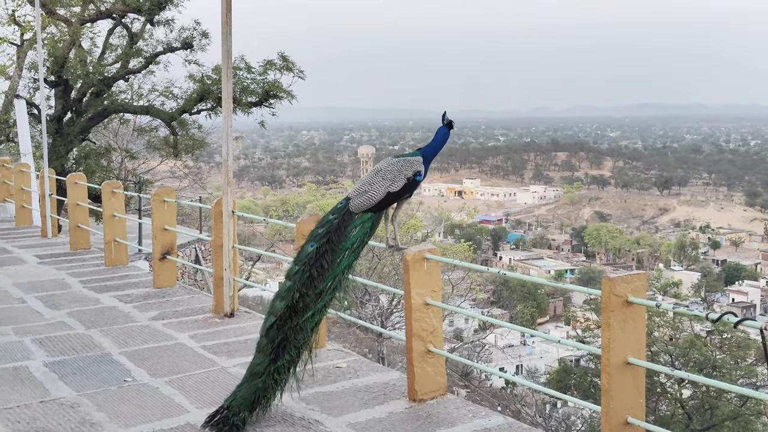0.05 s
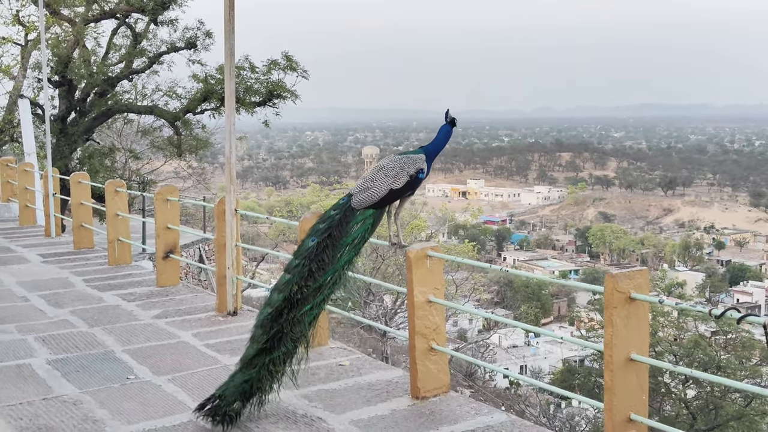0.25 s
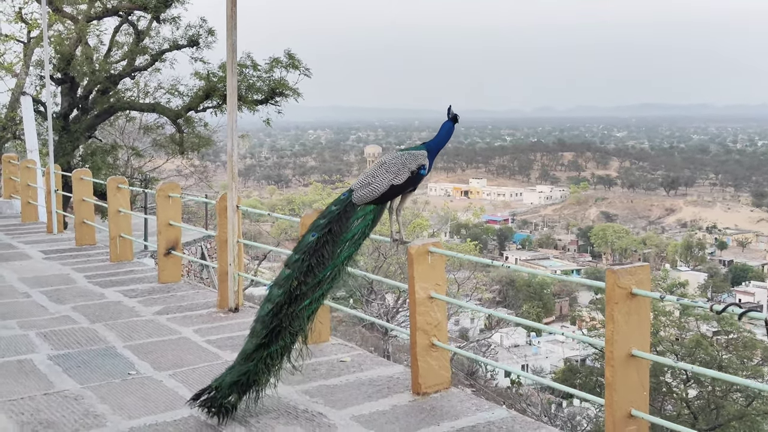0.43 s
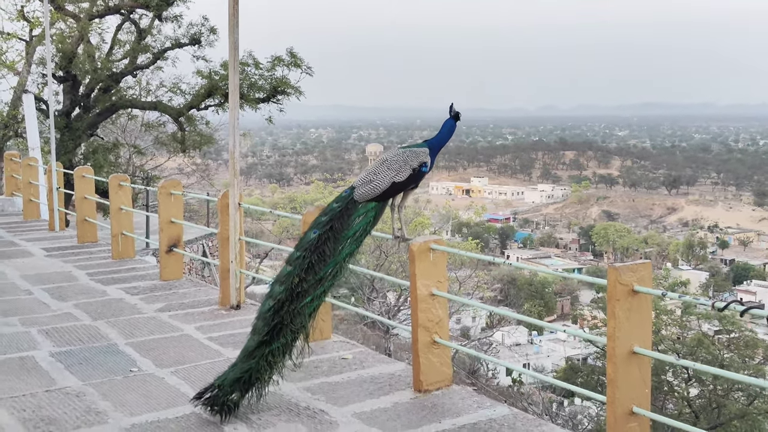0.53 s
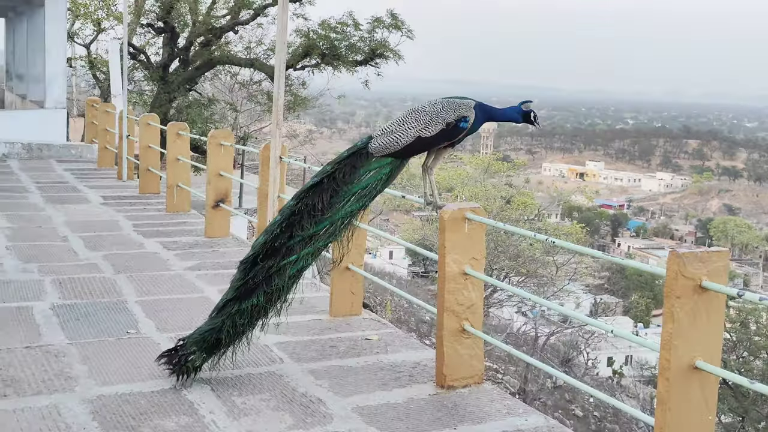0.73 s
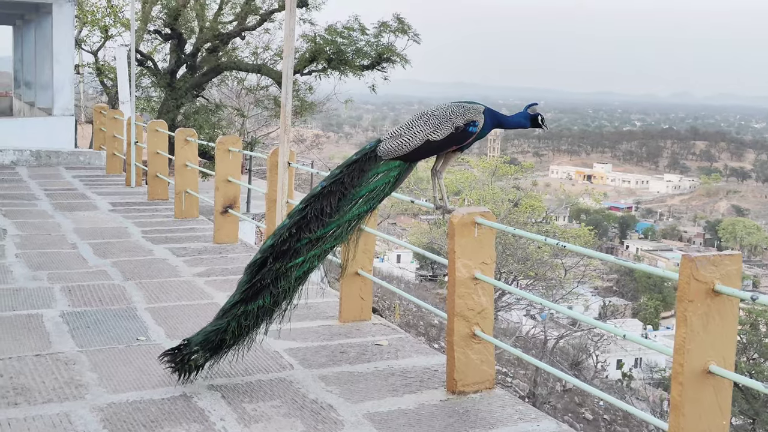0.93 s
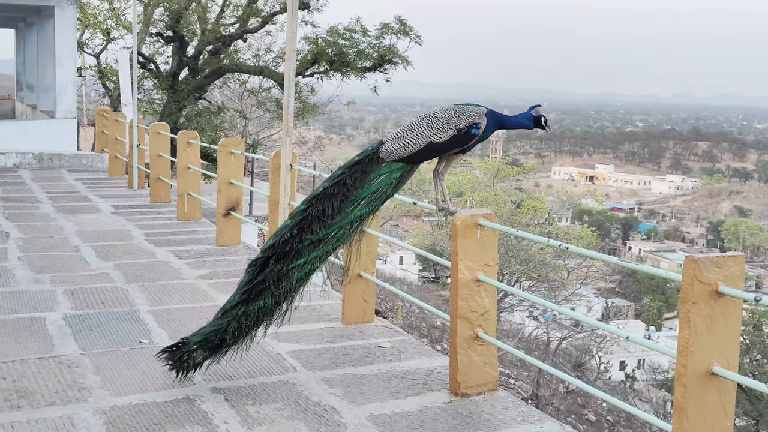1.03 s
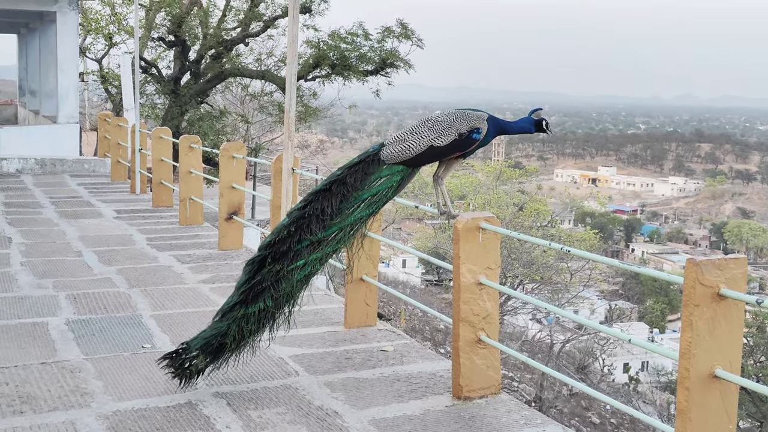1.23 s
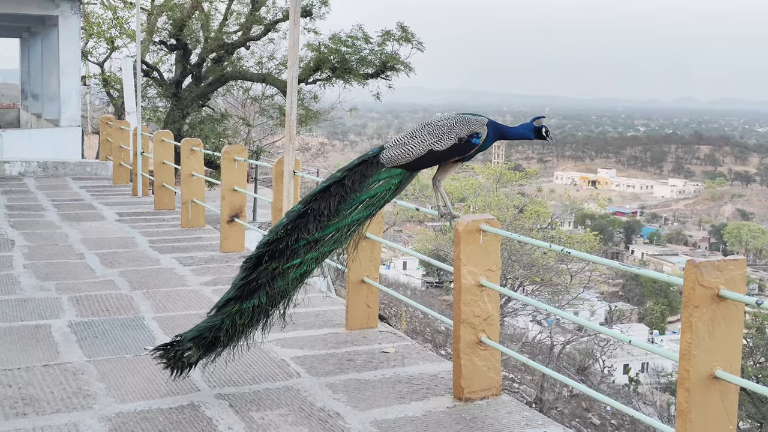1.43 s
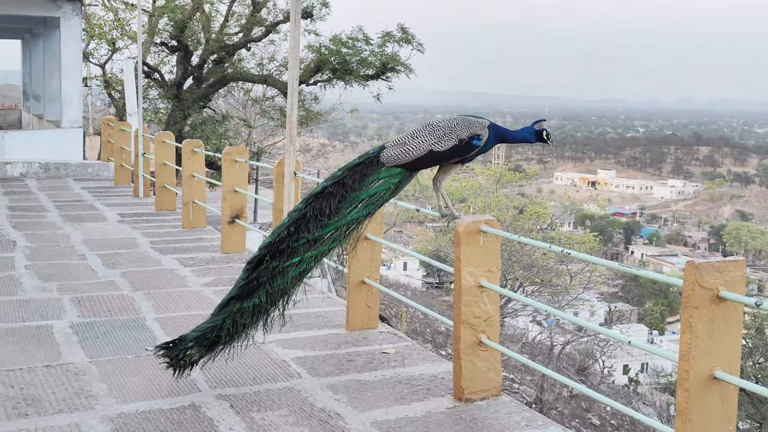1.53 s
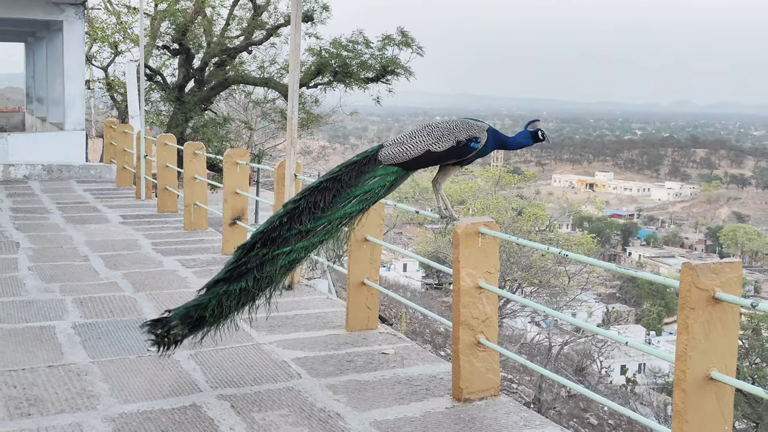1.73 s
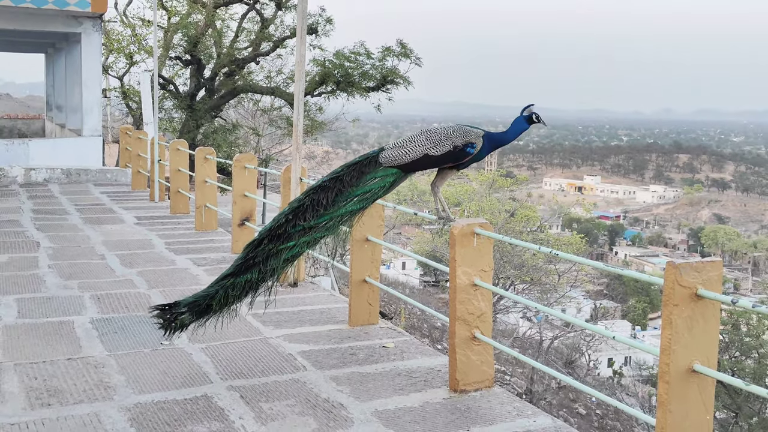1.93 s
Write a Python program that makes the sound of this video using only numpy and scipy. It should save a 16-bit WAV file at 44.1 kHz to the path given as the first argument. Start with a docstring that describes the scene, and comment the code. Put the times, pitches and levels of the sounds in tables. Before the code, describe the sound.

A peacock calls twice, close and loud: a croaky, fluttering honk that sags in pitch, then a clearer call stepping up and falling. Faint echoes trail over the open hillside, with a faint far cry at the end.

```python
"""A peacock gives two loud honking calls close by: the first croaks, then flutters as it sags; the second
steps up to a clear, higher arch. Each call is a jittering harmonic stack shaped by a moving throat, plus rasp.
Terrace and hillside answer faintly: single reflections and scattered tails, convolved with the bird.
Filtered noise makes the outdoor hiss, which drops away in the first call to leave a hush and a thin fizz.
Near the end one wavering partial makes a faint, rising cry far away."""
import sys
import numpy as np
from scipy import signal
from scipy.fft import rfft, irfft
from scipy.io import wavfile
from scipy.ndimage import uniform_filter1d, map_coordinates

SR = 44100
rng = np.random.default_rng(int(sys.argv[2]) if len(sys.argv) > 2 else 0)


def generate_wav(signal):
    """Clip the signal to [-1, 1] and save it as 16-bit WAV at the path in sys.argv[1]."""
    frames = np.transpose(np.atleast_2d(signal))
    scaled = np.clip(frames, -1, 1) * 32767
    pcm = np.round(scaled).astype(np.int16)
    wavfile.write(sys.argv[1], SR, pcm)


N = 88200  # 2 s

JITTER_HZ = 517  # rate of the pitch jitter, near and far


def amp(db):
    """Decibels to gain."""
    return 10 ** (np.asarray(db) / 20)


def unit(x):
    """Scales to rms 1."""
    return x / np.sqrt(np.mean(x ** 2) + 1e-20)


def at_hz(points, hz):
    """Reads a spectrum on a log-frequency axis."""
    f, value = np.transpose(points)
    return np.interp(np.log(hz + 1), np.log(f + 1), value)


def at_time(rows, t):
    """Reads every column of a curve table, whose first column is time."""
    s, *columns = np.transpose(rows)
    return [np.interp(t, s, c) for c in columns]


def add(mix, s, sound):
    """Mixes a sound in, starting at s seconds."""
    part = mix[round(s * SR):][:len(sound)]
    part += sound[:len(part)]


def colour(x, points):
    """Filters by a spectrum, with zero phase."""
    hz = np.fft.rfftfreq(2 * N, 1 / SR)
    filtered = irfft(rfft(x, 2 * N) * amp(at_hz(points, hz)))
    return filtered[..., :x.shape[-1]]


def wander(t, hz):
    """Smooth chance of rms about 1, with a new value at the given rate."""
    return map_coordinates(rng.standard_normal(2000), [(t - t[0]) * hz], order=2, mode="wrap")


def patchy_noise(points, size=512):
    """Noise of a given spectrum at rms 1, its level varying in small random patches of time and pitch."""
    patch_db = 2
    _, _, z = signal.stft(rng.standard_normal(N), SR, nperseg=size)
    patches = uniform_filter1d(rng.standard_normal(z.shape), size=6, axis=0)  # across frequency
    patches = unit(uniform_filter1d(patches, size=10, axis=1))  # across time
    _, noise = signal.istft(z * amp(patch_db * patches), SR, nperseg=size)
    return unit(colour(noise[:N], points))


def outdoors():
    """Three beds of shaped noise: a hiss that drops as the first call swells, a faint hush and a fizz."""
    # noise spectra: [f/Hz, relative level/dB]
    hiss_colour = [(25, -24), (60, -9.5), (170, -13.5), (320, -8), (460, -11), (700, -8.5), (1160, -5.5),
                   (1520, -7), (2100, -2), (2600, -10.5), (3000, -8), (4500, -11.5), (6100, -10.5),
                   (8250, -8), (10100, -10.5), (11000, -29), (15300, -31)]
    hush_colour = [(25, -3), (70, 0), (150, -10), (400, -9.5), (1000, -11.5), (2100, -3.5), (3000, -7.5),
                   (4000, -19.5), (5500, -12), (7000, -17.5), (10200, -25), (10900, -38), (15000, -43)]
    fizz_colour = [(3000, -23), (5500, -17), (7000, -3.5), (8200, 0), (10200, -6), (10900, -25),
                   (15000, -46)]
    # how the thin high fizz rises and fades: [t/s, level/dB]
    fizz_level = [(.8, -53), (1.1, -49.5), (1.8, -61)]
    hiss_db, hush_db = -27, -47
    fall_start_s, fall_db_per_s = 0.3, 105
    t = np.arange(N) / SR
    fall_db = fall_db_per_s * np.maximum(t - fall_start_s, 0)
    hiss = amp(hiss_db - fall_db) * patchy_noise(hiss_colour)
    hush = amp(hush_db) * patchy_noise(hush_colour)
    fizz = amp(at_time(fizz_level, t)[0]) * patchy_noise(fizz_colour)
    return hiss + hush + fizz


def far_cry():
    """One partial whose pitch rises and wavers, blurred by distance; returns start time and sound."""
    # the faint cry: [t/s, f/Hz, level/dB]
    cry_curve = [(1.919, 1520, -51), (1.96, 1610, -44), (1.979, 1710, -57), (2.0, 1857, -40)]
    jitter = 0.031  # share of the pitch
    t = np.arange(cry_curve[0][0], cry_curve[-1][0], 1 / SR)
    hz, level_db = at_time(cry_curve, t)
    turns = np.cumsum(hz * (1 + jitter * wander(t, JITTER_HZ))) / SR
    return t[0], np.sqrt(2) * amp(level_db) * np.sin(2 * np.pi * turns)


def tail(ring, echo, size=256):
    """Sparse random reflections, each band changing at its own speed: a negative ring swells."""
    taps = rng.standard_normal(N) * (rng.random(N) < 2000 / SR)  # about 2000 a second
    hz, t, z = signal.stft(taps, SR, nperseg=size)
    fade = amp(-60 * t / at_hz(ring, hz)[:, None])
    fade = fade * (t > .005)  # no tail in the first 5 ms
    fade = fade / np.sqrt((fade ** 2).mean(1, keepdims=True))
    fade = fade * amp(at_hz(echo, hz))[:, None]
    _, scattered = signal.istft(z * fade, SR, nperseg=size)
    return scattered[:N] / np.linalg.norm(taps)


def surroundings(x):
    """Convolves the bird with single reflections from paving and walls and with two scattered tails."""
    # time for each band to ring down by 60 dB: [f/Hz, t60/s]
    hill_ring = [(300, .7), (1300, 1.04), (1750, 1.03), (2500, 0.8), (5000, 1), (12000, -1.7)]
    terrace_ring = [(500, 0.6), (4000, 0.4), (12000, 0.1)]
    # strength of each tail: [f/Hz, level/dB]
    hill_echo = [(300, -49), (700, -22), (1300, -20), (1550, -19.5), (1750, -22.5), (2300, -19),
                 (2900, -21.5), (4000, -25.5), (7000, -17), (13000, -26)]
    terrace_echo = [(500, -23), (1400, -20), (2300, -15), (3200, -9), (4300, -11), (5500, -1),
                    (7500, -11.5), (13000, -1)]
    # single reflections: [delay/s, level/dB]
    slaps = [(.0075, -20), (.027, -18.5), (.058, -35)]
    response = tail(hill_ring, hill_echo) + tail(terrace_ring, terrace_echo)
    for delay, db in slaps:
        add(response, delay, amp([db]))
    return signal.fftconvolve(x, response)[:N]


def sink(bird):
    """Gain of everything behind the bird: its smoothed power pulls echoes and air down while it is loud."""
    deepest_db, knee_db, smooth_s = -4.5, -7, 0.0091  # half the deepest dip at the knee
    power = abs(uniform_filter1d(bird ** 2, max(round(smooth_s * SR), 1)))
    return amp(deepest_db * power / (power + amp(knee_db) ** 2))


def gate(t):
    """Quick linear attack and release."""
    attack_s, release_s = 0.0018, .01
    return np.clip((t - t[0]) / attack_s, 0, 1) * np.clip((t[-1] - t) / release_s, 0, 1)


def rasp(turns, points):
    """Breath noise in a puff on every cycle of the voice, shaped by a spectrum."""
    puffs = 1 + np.cos(2 * np.pi * turns)
    return unit(colour(rng.standard_normal(N)[:len(turns)] * puffs, points))


def croak():
    """A few rough cycles of harmonics and rasp as the voice catches before the first call."""
    # colour of the croak: [f/Hz, relative level/dB]
    croak_colour = [(200, -30), (620, -6), (900, -7), (1200, 0.5), (1700, 3), (2500, -13), (3800, -18),
                    (6000, -16.5), (9000, -41), (13000, -55)]
    start_s, length_s, pitch_hz, level_db = .1945, .014, 607, -10.5
    rough = .4  # share of rasp in the blend
    t = np.arange(0, length_s, 1 / SR)
    harmonics = sum(np.cos(2 * np.pi * k * pitch_hz * t) for k in range(1, 12))
    folds = unit(colour(harmonics, croak_colour))
    burst = unit((1 - rough) * folds + rough * rasp(pitch_hz * t, croak_colour))
    swell = np.sin(np.pi * t / length_s)
    return start_s, amp(level_db) * swell * burst


def overtone_sizes(t, pitch, levels, rough, opening, opened, closed, count):
    """Rms of every harmonic: a throat between two shapes colours the overtones, which drift and flicker."""
    treble_hz, top_hz = 4500, 8500  # where the middle gives way to treble, and treble to top
    shimmer_db, shimmer_hz = 2.33, 20.14  # each overtone drifts on its own
    breakup_db, breakup_hz = 17, 167.3  # and flickers where the voice is rough
    share = np.clip(at_time(opening, t)[0], 0, 1)
    over_hz = np.arange(3, count + 1)[:, None] * at_time(pitch, t)[0]
    drift = np.array([
        shimmer_db * wander(t, shimmer_hz) + breakup_db * rough * wander(t, breakup_hz)
        for _ in over_hz
    ])
    throat = amp(share * at_hz(opened, over_hz) + (1 - share) * at_hz(closed, over_hz) + drift)
    high, higher = (.5 + .5 * np.tanh(20 * np.log(over_hz / hz)) for hz in (treble_hz, top_hz))
    root, octave, *band_levels = amp(at_time(levels, t))
    bands = (1 - high, high - higher, higher)
    # the throat colours each band, the level curve sets its strength
    overtones = sum(
        level * throat * band / np.sqrt((throat ** 2 * band).sum(0))
        for level, band in zip(band_levels, bands)
    )
    return np.vstack([root, octave, overtones])


def call(pitch, levels, grain, opening, opened, closed, count=22):
    """A fluttering, jittering stack of harmonics through a moving throat, with rasp where it is rough."""
    # colour of the breath: [f/Hz, relative level/dB]
    rasp_colour = [(100, -27), (400, -20), (700, -14), (1600, -6), (2700, -25), (3900, -4), (6000, -15),
                   (9000, -16), (13000, -44), (15500, -40)]
    rasp_db = -7  # against the voice, where fully rough
    flutter_hz, flutter_crest_s = 53.6, .3425
    flutter_swing, jitter = 0.051, .035  # shares of the pitch at full flutter and full roughness
    fray_turns, fray_hz = 0.042, 698  # phase scatter of the highest overtone; lower ones are far steadier
    t = np.arange(round(pitch[0][0] * SR), round(pitch[-1][0] * SR)) / SR
    rough, depth = np.clip(at_time(grain, t), 0, 1)

    # flutter lowers the pitch as it lifts the level
    shake = depth * np.cos(2 * np.pi * flutter_hz * (t - flutter_crest_s))
    bend = 1 - flutter_swing * shake + jitter * rough ** 1.43 * wander(t, JITTER_HZ)
    turns = np.cumsum(at_time(pitch, t)[0] * bend) / SR

    slow = t[::32]  # coarse clock for the slower curves
    sizes = overtone_sizes(slow, pitch, levels, rough[::32], opening, opened, closed, count)
    voice = np.zeros(len(t))
    for k, size in enumerate(sizes, 1):
        fray = fray_turns * (k / count) ** 2.05 * np.interp(t, slow, wander(slow, fray_hz))
        phase = 2 * np.pi * (k * turns + fray) + np.pi * k ** 2 / count  # staggered start phases
        voice -= np.sqrt(2) * np.interp(t, slow, size) * np.cos(phase)
    loudness = np.interp(t, slow, np.linalg.norm(sizes, axis=0))
    air = amp(rasp_db) * rough ** 1.67 * loudness * rasp(turns, rasp_colour)
    return t[0], gate(t) * (1 + shake) * (voice + air)


def first_call():
    """The sagging call: a pitch that rises, holds and falls, deep flutter and a throat closed by mid-call."""
    # pitch before flutter and jitter: [t/s, f/Hz]
    pitch = [(.224, 617.6), (.238, 634.3), (.252, 615), (.275, 661), (.302, 695.3), (.352, 697.6),
             (.43, 698.6), (.484, 686.3), (.552, 676), (.65, 645.4), (.748, 601.7), (.772, 582), (.79, 576)]
    # loudness: [t/s, fundamental/dB, octave/dB, middle overtones/dB, treble/dB, top/dB]
    levels = [(0.228, -17.5, -17.5, -38, -33, -46), (0.264, -9.5, -16.5, -22.5, -35, -34),
              (0.304, -17, -10, -20.5, -21.5, -27.5), (0.318, -16, -16, -19, -30, -36),
              (0.326, -16.5, -8, -19, -24, -26), (0.396, -21, -8.5, -23.5, -22, -28.5),
              (0.454, -23.5, -7, -23, -25.5, -36.5), (0.48, -20.5, -8.5, -28, -19.5, -39),
              (0.518, -23.5, -8.5, -23.5, -19, -36.5), (0.624, -23.5, -6.5, -26, -31, -45),
              (0.646, -26.5, -4.5, -24.5, -26.5, -49), (0.752, -29.5, -13.5, -29.5, -48, -49),
              (0.772, -36, -26, -32, -43, -50), (0.785, -66, -29, -30, -53, -62)]
    # texture: [t/s, roughness/0-1, flutter depth/0-1]
    grain = [(.224, .75, 0.42), (.28, 0.65, 0.41), (.32, .17, 0.21), (.4, 0.06, 0.21), (.44, 0.14, 0.15),
             (.5, 0.17, 0.14), (.6, 0.19, 0.15), (.7, 0.12, 0.1), (.79, 0.26, 0.09)]
    # how far the throat is open: [t/s, share/0-1]
    opening = [(.25, 0.85), (.33, .95), (.43, 0.4), (.5, 0.04), (.78, 0)]
    # throat colour while open, early in the call, and once closed, later in the call: [f/Hz, relative level/dB]
    opened = [(2080, -0.5), (2780, -12.5), (3500, 4), (4180, 3), (4880, -9), (5570, -2), (6270, -12),
              (6970, 3), (7680, -2), (8350, -34), (9050, -15), (10450, -19), (11150, -21), (11850, -5.5),
              (13200, -22), (14500, -38)]
    closed = [(1800, -0.5), (2050, -2), (2330, -9.5), (2700, -6.5), (3200, 0), (3650, -10), (4100, -4.5),
              (4450, -6.5), (4800, 0), (5100, 0), (5420, -0.5), (5780, -6), (6130, 2.5), (6450, -4),
              (6750, -6), (7400, -20), (8200, -19), (8900, -14), (10500, -23), (12300, -23), (14000, -43)]
    return call(pitch, levels, grain, opening, opened, closed)


def second_call():
    """The arching call: a step up to a clear, higher pitch as the throat opens, then a fall as it closes."""
    # pitch before flutter and jitter: [t/s, f/Hz]
    pitch = [(1.14, 611), (1.17, 693.5), (1.2, 717.6), (1.25, 704), (1.278, 779), (1.298, 821.7),
             (1.328, 849), (1.45, 875.4), (1.55, 854.7), (1.65, 790.2), (1.72, 736), (1.748, 666)]
    # loudness: [t/s, fundamental/dB, octave/dB, middle overtones/dB, treble/dB, top/dB]
    levels = [(1.142, -34, -30, -30, -39, -63), (1.154, -28.5, -20.5, -21.5, -25.5, -67),
              (1.166, -24, -17, -12.5, -33, -48), (1.202, -19.5, -13, -11.5, -19, -41.5),
              (1.242, -24, -15.5, -12, -25, -44), (1.26, -20, -18, -12, -32, -52),
              (1.276, -23.5, -11.5, -20.5, -26.5, -35), (1.31, -19.5, -1.5, -21, -25, -51),
              (1.354, -31, -12, -29, -29, -43), (1.372, -28.5, -7.5, -27, -22.5, -40.5),
              (1.456, -25, -10, -32, -31.5, -43.5), (1.51, -22.5, -9.5, -29, -23.5, -40),
              (1.556, -31.5, -13, -18, -39, -34), (1.606, -24.5, -17.5, -21, -37, -36.5),
              (1.628, -34.5, -23.5, -17, -30, -38), (1.67, -26, -23, -15, -31.5, -38.5),
              (1.69, -31, -32, -17.5, -37, -47), (1.72, -26.5, -21.5, -21.5, -30.5, -52),
              (1.732, -35, -31, -15.5, -34, -57), (1.745, -33, -22.5, -18, -25, -52)]
    # texture: [t/s, roughness/0-1, flutter depth/0-1]
    grain = [(1.14, 0.87, 0.0073), (1.175, 0.16, 0.0076), (1.245, 0.14, 0), (1.275, 0.29, 0.18),
             (1.325, 0.18, 0.024), (1.345, .01, 0), (1.56, .02, 0.015), (1.64, 0.087, 0.0035),
             (1.7, 0.14, 0.098), (1.748, 0.43, .1)]
    # how far the throat is open: [t/s, share/0-1]
    opening = [(1.25, 0.02), (1.31, 0.69), (1.52, 0.85), (1.6, 0.74), (1.74, 0.036)]
    # throat colour while open, at the height of the arch, and closed, at its ends: [f/Hz, relative level/dB]
    opened = [(2250, 9), (2570, -12), (3000, -31), (3420, 9.5), (4200, -13.5), (4350, -5.5), (5150, -16),
              (5950, -3), (6850, -10.5), (7700, -7.5), (8600, -17), (10300, -23), (12000, -24),
              (13000, -28), (15000, -36)]
    closed = [(1950, 9.5), (2200, 4.5), (2500, 7.5), (2870, 4), (3380, -10.5), (3700, -8.5), (4100, -10.5),
              (4310, -2.5), (4600, -5.5), (4950, -16.5), (5750, -7), (6450, -12), (7200, -25), (8500, -23),
              (9200, -24), (10500, -19), (12800, -23), (14500, -43)]
    return call(pitch, levels, grain, opening, opened, closed)


def scene():
    """The bird, its echoes, the open air and the far cry, alike in both channels."""
    bird = np.zeros(N)
    add(bird, *croak())
    add(bird, *first_call())
    add(bird, *second_call())
    behind = surroundings(bird) + outdoors()
    add(behind, *far_cry())
    return np.tile(bird + sink(bird) * behind, (2, 1))


def record(dry):
    """Rounds off the loudest peaks, adding little bass, then limits the band."""
    ceiling, splatter_hz, edge_hz = 1.0, 250, 15500
    shaved = dry / (1 + (dry / ceiling) ** 10) ** (1 / 10) - dry
    # only the part of the rounding above splatter_hz is kept
    highpass = signal.butter(2, splatter_hz, "highpass", fs=SR, output="sos")
    held = dry + signal.sosfilt(highpass, shaved)
    lowpass = signal.firwin(511, edge_hz, window=("kaiser", 9), fs=SR)
    return signal.oaconvolve(held, lowpass[None], "same")


dry = scene()
out = record(dry)
generate_wav(out)
```